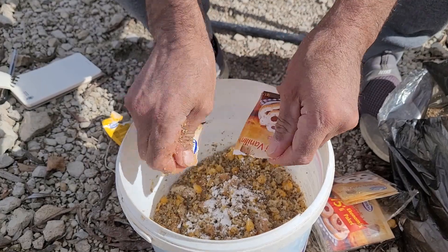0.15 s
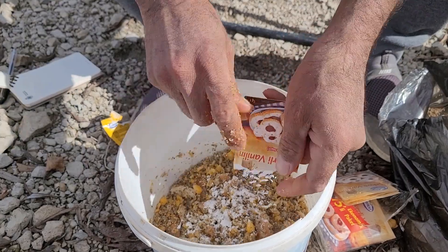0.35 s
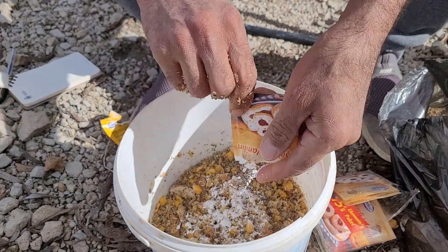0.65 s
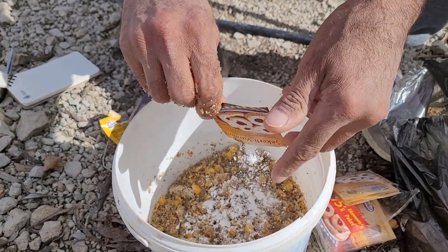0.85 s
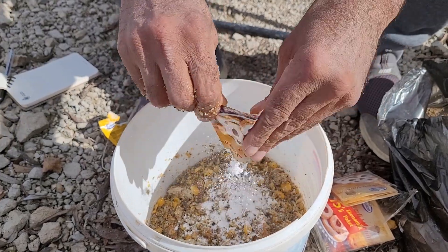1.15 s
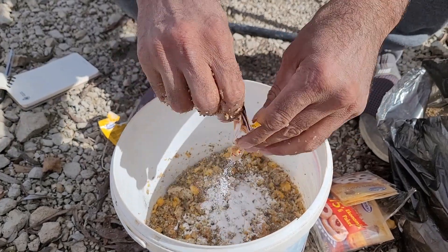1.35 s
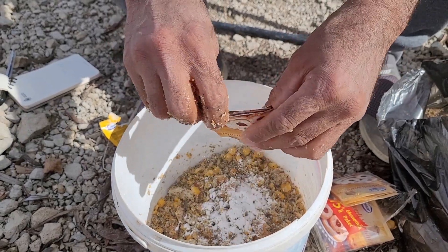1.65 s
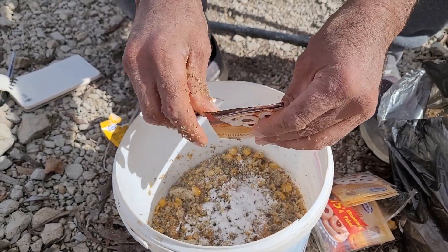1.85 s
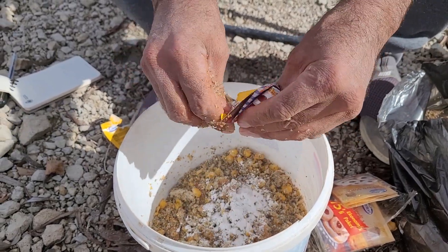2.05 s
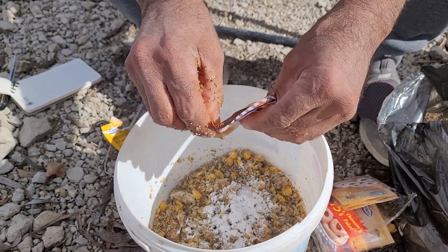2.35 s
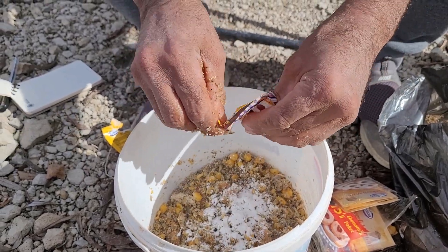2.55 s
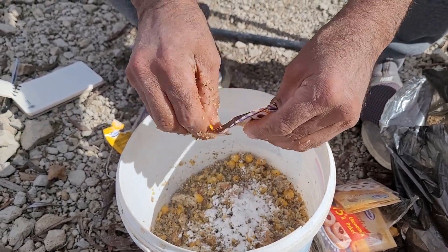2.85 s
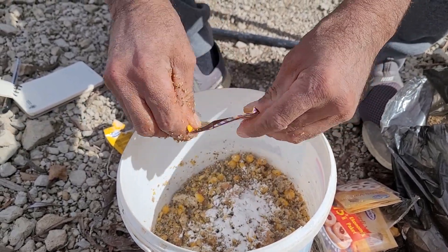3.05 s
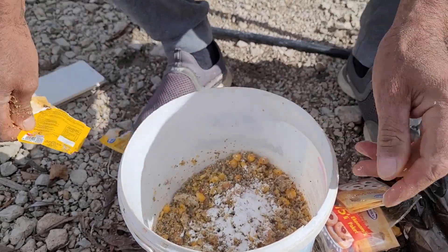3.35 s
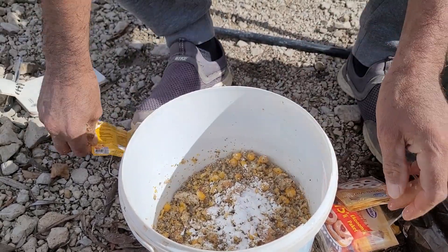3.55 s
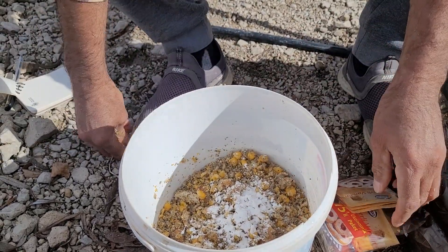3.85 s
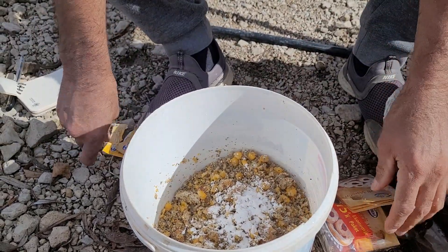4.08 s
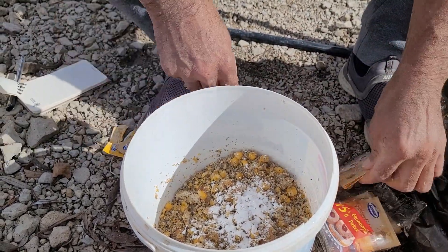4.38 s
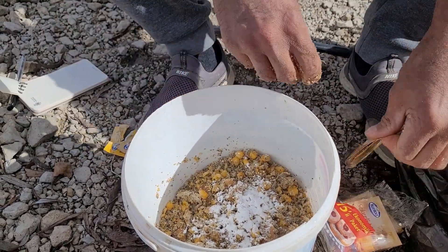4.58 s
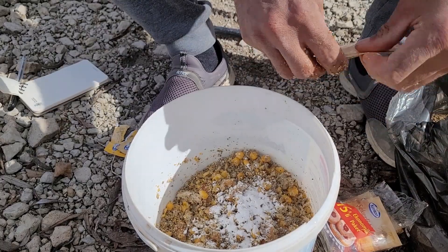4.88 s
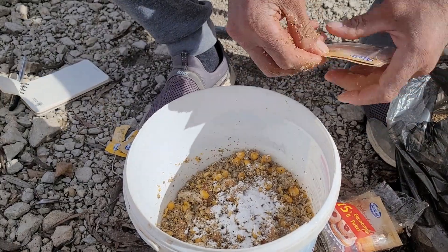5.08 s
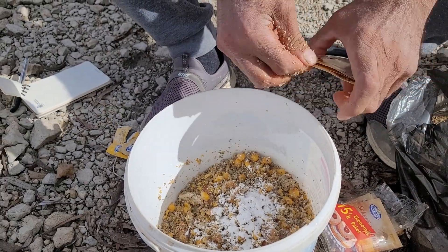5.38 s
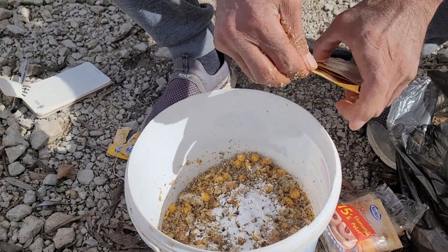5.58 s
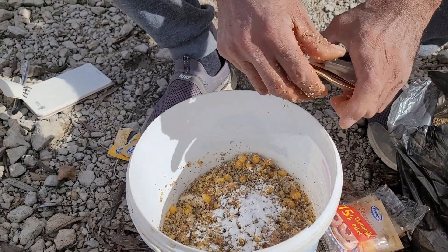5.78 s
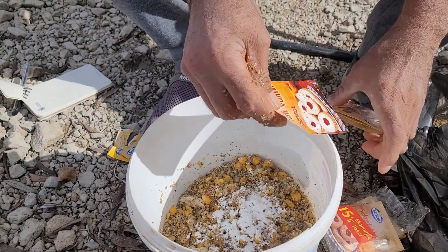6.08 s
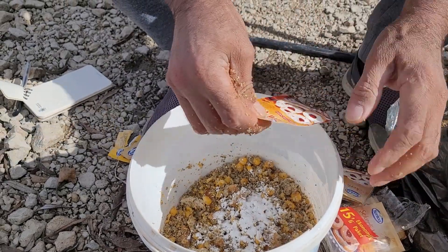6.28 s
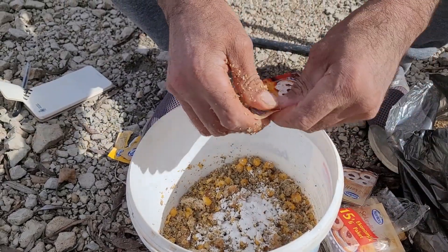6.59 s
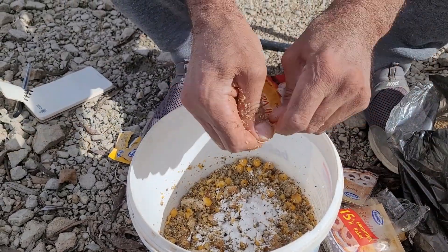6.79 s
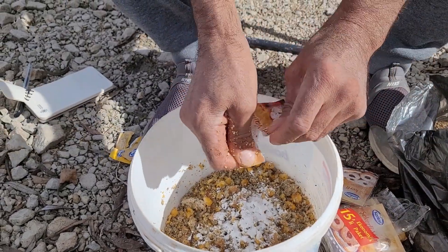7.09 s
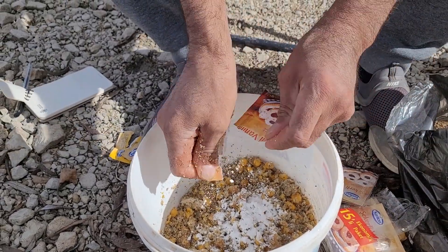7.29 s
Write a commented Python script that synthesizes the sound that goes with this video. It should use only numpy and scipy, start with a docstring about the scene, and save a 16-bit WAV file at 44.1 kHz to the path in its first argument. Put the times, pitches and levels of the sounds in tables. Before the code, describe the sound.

Close outdoor sound of little paper packets being opened over a bucket. A brief rip and low wind buffeting come first, followed by scattered crisp crackles and sliding powder that build into busier crinkling. The paper pauses briefly, then rustles and snaps again with a few soft finger taps, ending in several short tears. Light wind bumps the microphone, and a faint far hum and airy hiss lie behind.

```python
"""Small paper sachets crinkle, shake and tear in two hands over an open plastic bucket, close up, outdoors.
Each crease snaps and the bucket throws it back for a few ms; paper and powder rustle in between,
and fingers knock softly on the packets. A light wind buffets the two microphone ports separately
over a faint far hum and hiss."""
import sys
import numpy as np
from scipy.fft import rfft, irfft, next_fast_len
from scipy.io import wavfile
from scipy.ndimage import uniform_filter1d, map_coordinates

SR = 44100
rng = np.random.default_rng(int(sys.argv[2]) if len(sys.argv) > 2 else 0)


def unload_wav(signal):
    """Save mono or channel-first audio to the path in sys.argv[1] as 16-bit WAV at rate SR, clipped to [-1, 1]."""
    wavfile.write(
        sys.argv[1],
        SR,
        np.round(np.clip(np.atleast_2d(signal).T, -1, 1) * 32767).astype(np.int16),
    )


N = 327663


def amp(db):
    """Decibels to gain."""
    return 10 ** (np.asarray(db) / 20)


def unit(x):
    """Scaled to rms 1."""
    return x / np.sqrt(np.mean(x ** 2) + 1e-20)


def along(points, hz):
    """Read (frequency, value) points on a log axis."""
    freqs, values = np.transpose(points)
    return np.interp(np.log(hz + 1), np.log(freqs + 1), values)


def curves(rows):
    """One automation curve for each column after the time."""
    times, *columns = np.transpose(rows)
    return [np.interp(np.arange(N) / SR, times, column) for column in columns]


def wobble(rate):
    """A smooth random curve, rate knots a second."""
    return map_coordinates(rng.standard_normal(int(N * rate / SR) + 4), [np.arange(N) * rate / SR])


def filtered(x, response):
    """x through a frequency response."""
    size = next_fast_len(N + 8192)
    return irfft(rfft(x, size) * response(np.fft.rfftfreq(size, 1 / SR)), size)[..., :N]


def coloured(x, spectrum):
    """x through an EQ of (frequency [Hz], level [dB]) points, at rms 1."""
    return unit(filtered(x, lambda hz: amp(along(spectrum, hz))))


def steady_noise(spectrum, span_s):
    """Coloured stereo noise, its swells slower than span_s mostly levelled."""
    noise = coloured(rng.standard_normal((2, N)), spectrum)
    envelope = np.sqrt(np.abs(uniform_filter1d(noise ** 2, int(span_s * SR))))
    return unit(noise / (envelope + 0.21))


def gate(start, length, attack_s, release_s):
    """Rises, holds and lets go inside length seconds."""
    age = np.arange(N) / SR - start
    return np.clip(age / attack_s, 0, 1) * np.clip((length - age) / release_s, 0, 1)


def resonance(hz, centre_hz, width_hz):
    """A causal band-pass of peak gain 1."""
    return 1j * hz * width_hz / (centre_hz ** 2 - hz * hz + 1j * hz * width_hz)


# tone of the hiss: (frequency [Hz], level [dB])
HISS_EQ = [(530, -1), (900, 3.5), (1450, 0.5), (3190, -1), (3920, -0.5), (7300, -6.5), (8760, -14),
           (14100, -13), (15900, -12), (16500, -43)]


def hiss():
    """A smooth bed of outdoor air, independent at each port."""
    return amp(-63.5) * coloured(rng.standard_normal((2, N)), HISS_EQ) * amp([[-.6], [.6]])


# tone of the hum: (frequency [Hz], level [dB])
HUM_EQ = [(53, -69), (90, -13.5), (199, -10), (368, -7.5), (468, -12), (815, -14), (1000, -22), (1600, -40),
          (2080, -21), (3520, -120)]
# its stereo image: (frequency [Hz], left-right correlation [0-1])
HUM_IMAGE = [(100, 1), (300, 0.8), (700, 0.83), (1500, 0)]
# its fader ride: (time [s], relative level [dB], bass shelf [dB])
HUM_RIDE = [(.6, -64, -10.5), (.89, -69.5, -15), (1.9, -65.5, -19), (2.24, -70.5, 1), (2.5, -62.5, -28),
            (2.87, -68, -5), (3.57, -68, -7.5), (3.76, -66, 0.5), (4.36, -62.5, 3), (4.96, -66, -1),
            (5.4, -63, 0.5), (6, -67.5, -6.5), (6.35, -63, 8), (6.55, -66, 3.5), (6.89, -66, -7),
            (7.24, -64, -4), (7.43, -63, 2.5)]


def far_hum():
    """A distant, wavering hum, centred in the bass and wide higher up."""
    def mid_side(hz):
        spread = np.arccos(np.clip(along(HUM_IMAGE, hz), -1, 1)) / 2
        return amp(along(HUM_EQ, hz)) * [np.cos(spread), np.sin(spread)]

    mid, side = filtered(rng.standard_normal((2, N)), mid_side)
    hum = unit(np.array([mid + side, mid - side]))
    bass = filtered(hum, lambda hz: 1 / (1 + (hz / 210) ** 8))
    level_db, shelf_db = curves(HUM_RIDE)
    return amp(level_db + 3 + 2.6 * wobble(9)) * (hum - bass + amp(shelf_db) * bass)


def port_power(level_db, pan_db):
    """Wind power shared between the left and right port."""
    left_share = 1 / (1 + amp(-pan_db) ** 2)
    return 4 * amp(level_db) ** 2 * np.array([left_share, 1 - left_share])


# the breeze on the ports: (time [s], relative level [dB], left over right [dB])
BREEZE_RIDE = [(.4, -60, -29), (.75, -66, -31), (1.05, -62.5, -36), (1.4, -70.5, -28.5),
               (1.65, -58.5, -33.5), (1.85, -56, -28), (2.05, -66, -25), (2.3, -55, -36), (2.55, -61, -28),
               (2.78, -60, -25.5), (2.9, -71, -26), (3.3, -65, -35), (3.5, -79.5, -17.5), (3.85, -74, -6.5),
               (4.5, -76, -2), (5, -78, -16), (5.6, -70, -8), (6, -79, -22.5), (6.55, -64, -14),
               (6.68, -72.5, 0.5), (6.85, -49, 0), (7.2, -53.5, 0), (7.3, -56.5, -14), (7.43, -75, 11)]
# single eddies: (start [s], length [s], relative level [dB], left over right [dB], bite [dB])
EDDY_CUES = [(-.03, .47, -37, 24, -11.5), (-.02, 0.064, -52, 16.5, -6.5), (0.044, 0.046, -32.5, 17, -27.5),
             (0.109, 0.059, -23.5, 36, -2), (0.171, 0.088, -25.5, 25, -5), (.265, 0.051, -27.5, 29.5, -2.5),
             (0.298, .045, -21, 35, -1), (0.337, 0.056, -31, 21, 0.5), (0.394, 0.039, -24.5, 28.5, -8),
             (0.476, 0.039, -57.5, -31, -1), (0.574, 0.12, -61.5, -28, -3),
             (0.923, 0.097, -53.5, -33.5, -13), (1.1, 0.091, -56, -34, -11), (1.721, 0.082, -53, -1, -10),
             (1.793, 0.062, -56.5, -26.5, -10), (1.873, 0.029, -38, -6, -22),
             (1.944, 0.055, -55.5, -24, -8), (2.482, 0.057, -47, -35, -11), (2.645, 0.04, -44.5, -5, -18),
             (4.63, 0.0757, -66, -1, 3), (4.76, 0.056, -57.5, -5, -2), (5.184, 0.053, -66.5, 1, -1),
             (6.058, 0.086, -67, -6.5, -5), (6.74, 0.054, -46.5, 1, -20), (6.802, 0.051, -48, -1, -6),
             (6.916, 0.11, -49.5, -2, 3), (7.075, 0.064, -51.5, -12, -14), (7.223, 0.041, -38.5, 1, -5.5)]
# the wind's low rumble, and the bite and thump of strong gusts: (frequency [Hz], level [dB])
RUMBLE_EQ = [(12, -21), (20, -78), (43, 1.5), (59, 1), (116, -9.5), (172, -20), (300, -19.5), (390, -37),
             (660, -120)]
BITE_EQ = [(100, -10), (170, -6.5), (266, -2), (451, -19.5), (609, -29.5), (679, -31.5), (1500, -76),
           (1950, -80), (3300, -120)]
THUMP_EQ = [(50, -42), (90, -3), (140, 1), (190, -34), (300, -92)]


def wind():
    """Eddies buffet each port on its own; strong gusts reach higher in pitch."""
    level_db, pan_db = curves(BREEZE_RIDE)
    power = port_power(level_db + 0.5 * wobble(35), pan_db)
    bite_power = np.zeros((2, N))
    for start, length, db, side_db, bite_db in EDDY_CUES:
        eddy = port_power(db, side_db)[:, None] * gate(start, length, attack_s=.016, release_s=.0081) ** 4
        power += eddy
        bite_power += eddy * amp(bite_db) ** 2
    rumble = steady_noise(RUMBLE_EQ, span_s=.04)
    bite = steady_noise(BITE_EQ, span_s=.018)
    thump = steady_noise(THUMP_EQ, span_s=.0263)
    strength = power / (power + amp(-29.5) ** 2)  # 0 in calm air, toward 1 in a strong gust
    body = (1 - 0.45 * strength) * rumble + 0.52 * strength * thump
    return np.sqrt(power) * body + amp(-3) * strength * np.sqrt(bite_power) * bite


# fingers on the packets: (time [s], relative level [dB], pitch [Hz])
KNOCK_CUES = [(1.133, -48, 607), (1.714, -49.5, 613.7), (2.385, -43.5, 701), (2.43, -44, 577),
              (2.595, -45.5, 626), (2.729, -48.5, 603), (3.059, -45, 750), (4.66, -41, 271),
              (5.689, -42.5, 477), (6.307, -45, 644.7), (6.94, -40, 305.8)]


def finger_knocks(attack_s=.002, t60_s=.025):
    """A soft blow briefly rings the air in the packet: a hollow knock, dead centre."""
    out, t = np.zeros(N + SR), np.arange(SR // 20) / SR
    envelope = (1 - np.exp(-t / attack_s)) * amp(-60 * t / t60_s)
    for start, db, hz in KNOCK_CUES:
        out[round(start * SR):][:len(t)] += amp(db + 7.5) * envelope * np.sin(2 * np.pi * hz * t)
    return out[:N]


# where the hands are: (time [s], lead of the left port [ms])
HAND_PATH = [(0, 0.14), (3.2, 0.17), (3.75, 0.21), (3.95, .1), (4.1, 0.028), (4.7, -0.049), (5.2, 0.1),
             (5.8, 0.03), (6.2, -0.068), (6.7, 0.13), (7.43, 0.12)]


def left_lead_ms(times):
    """How much sooner sound from the hands reaches the left port."""
    return np.interp(times, *np.transpose(HAND_PATH))


# Weight is the paper's low band and sparkle its top band, both set against the middle band's level.
# paper held between strokes: (time [s], level [dB], weight [dB], sparkle [dB])
HOLD_RIDE = [(0, -62.5, 12, -5.5), (.4, -62, 5, -6), (1, -64.5, 2.5, -7), (1.9, -62, 5, -4),
             (2.3, -60, 3, -8), (3, -60.5, 3, -6), (3.2, -64, 6, -6), (3.75, -63.5, 5.5, -7),
             (4, -61, 1.5, -0.5), (4.5, -59, 2.5, 3), (4.65, -62.5, 5, -7.5), (5.3, -63, 5, -5),
             (5.65, -61, 3, -6), (5.85, -63.5, 4.5, -10.5), (6.15, -58.5, 2, 0.5), (6.42, -63.5, 4.5, -6.5),
             (6.93, -62, 5.5, -3.5), (7.43, -63, 4, -6.5)]
# paper and powder sliding: (peak time [s], level [dB], width [s], weight [dB], sparkle [dB])
SLIDE_CUES = [(.244, -56.5, 0.064, -1, -2), (.833, -59, 0.055, -1, -6), (1.003, -62.5, 0.1, 3.5, -3.5),
              (1.14, -52.5, 0.043, 4.5, -8.5), (1.227, -59.5, 0.067, 6, 0), (1.447, -62, 0.034, 0, 2),
              (1.63, -56, 0.018, -5, -1), (1.73, -54.5, 0.033, 0.5, -2), (2.309, -52.5, 0.046, 2.5, -1),
              (2.396, -53, 0.01, 10, -10), (2.468, -49.5, 0.033, -2, -6), (2.641, -48, .06, 0, -6),
              (2.805, -48, 0.04, -2.5, -1), (2.97, -51, 0.033, -2, -1), (3.062, -54, 0.021, 2, -10),
              (3.906, -56.5, 0.17, 5, -1), (3.956, -55, 0.018, 8.5, -3), (4.051, -61, 0.079, 4.5, -7),
              (4.147, -52.5, 0.045, 5.5, 1), (4.297, -54, 0.18, 0.5, -5), (4.529, -55.5, 0.026, -1, -6),
              (5.004, -64.5, 0.062, -7, 7), (5.217, -61, 0.078, -3.5, -4), (5.328, -51, 0.022, -26, -4),
              (5.44, -53, 0.074, -7, -5), (5.522, -53.5, 0.043, -2, -8), (5.748, -54.5, 0.031, -3, -5),
              (5.939, -59.5, 0.052, 2.5, 3.5), (6.111, -57.5, 0.034, -17, -4),
              (6.292, -43.5, 0.034, -4, -3), (6.336, -56, 0.058, 7, -6), (6.675, -61.5, 0.02, 8, -12)]
# paper tearing: (start [s], length [s], level [dB], weight [dB], sparkle [dB])
TEAR_CUES = [(-.02, 0.074, -41, -10, -1), (6.945, 0.089, -38.5, -6.5, 0), (7.101, 0.019, -43, 3, -10),
             (7.142, .09, -54, -3, 1), (7.195, 0.11, -45.5, -5, 3.5)]


def paper_strokes():
    """Power envelopes of the middle, weight and sparkle bands: holding, sliding and tearing add up."""
    level_db, weight_db, sparkle_db = curves(HOLD_RIDE)
    power = amp([level_db, level_db + weight_db, level_db + sparkle_db]) ** 2
    t = np.arange(N) / SR
    for peak, db, width, weight_db, sparkle_db in SLIDE_CUES:
        near = slice(max(round((peak - 3 * width) * SR), 0), round((peak + 3 * width) * SR))
        swell = amp(db - 17.5 * np.abs(t[near] - peak) / width)  # 17.5 dB down one width from the peak
        power[:, near] += (swell * amp([[0], [weight_db], [sparkle_db]])) ** 2
    for start, length, db, weight_db, sparkle_db in TEAR_CUES:
        rip = amp(db) * gate(start, length, attack_s=.0035, release_s=.044)
        power += (rip * amp([[0], [weight_db], [sparkle_db]])) ** 2
    return power


# tone of the rustle: (frequency [Hz], level [dB])
PAPER_EQ = [(290, -10), (600, 2.5), (1500, -5.5), (2700, 2), (4500, -1.5), (6800, -0.5), (9500, -3.5),
            (12000, 6.5), (15300, 0.5), (16500, -18)]


def rustle():
    """Tiny creases and fibres let go in clumps over a sliding hiss; the strokes ride it in three bands."""
    def moving(power, still_db):
        return np.sqrt(np.maximum(power - amp(still_db) ** 2, 0))

    clumps = amp(1.8 * wobble(90) + 2.2 * wobble(300))
    ticks = (rng.random(N) < .08) * amp(3 * rng.exponential(size=N).clip(0, 3)) * rng.standard_normal(N)
    grain = clumps * (0.77 * unit(ticks) + 0.5 * rng.standard_normal(N))
    samples = np.arange(N)
    shift = left_lead_ms(samples / SR) * SR / 1000 / 2  # half the lead goes to each port
    direct = np.array([map_coordinates(grain, [samples + s * shift], mode="nearest") for s in (1, -1)])
    diffuse = 2.07 * unit(clumps) * rng.standard_normal((2, N))
    paper = coloured(unit(direct) + diffuse, PAPER_EQ)
    low = filtered(paper, lambda hz: 1 / (1 + (hz / 3500) ** 6))
    high = filtered(paper, lambda hz: 1 / (1 + (8500 / (hz + 1)) ** 8))
    middle, weight, sparkle = paper_strokes()
    sound = (moving(middle, still_db=-64) * unit(paper - low - high)
             + moving(weight, still_db=-57.5) * unit(low)
             + moving(sparkle, still_db=-71) * unit(high))
    return amp(-3) * sound * amp([[-.8], [.8]])


def small_creases(count=160):
    """Random snap cues, laid out like SNAP_CUES, thickest and loudest where the paper moves most."""
    level, weight, _ = np.sqrt(paper_strokes())
    when, force = rng.random((count, 2)).T
    at = np.searchsorted(np.cumsum(level) / level.sum(), when).clip(SR // 100, N - 1)
    level_db = 20 * np.log10(level[at]) + 9 - 2 * np.log(force + 0.016)
    typical, spread = [5004, 2907, -17, -18.5, -17, -8.5], [1300, 140, 4, 2.87, 3.2, 1.7]
    timbre = typical + spread * rng.standard_normal((count, 6)).clip(-2, 2)
    timbre[:, 2:4] += 20 * np.log10(weight / level)[at, None]  # heavy strokes ring bucket and sheet more
    return np.column_stack([at / SR, level_db, timbre])


def snap_impulses(echo_db, common, own, ragged, release_at_s):
    """A faint noise lead-in, the crease's ragged click, then echoes partly unlike at each port."""
    age = np.arange(ragged.shape[-1]) / SR - release_at_s
    lead_in = amp(-32 + 60 * np.minimum(age, 0) / .02) * (age < 0)
    echoes = amp(echo_db - 60 * age / .016) * (1 - np.exp(-(age / .0017) ** 2)) * (age > 0)
    release = amp(-11 - 60 * np.abs(age) / .008) * (age > -.0003)
    impulses = (lead_in + echoes)[:, None] * (1.32 * common + 0.69 * own) + (release * ragged)[:, None]
    impulses[..., round(release_at_s * SR)] = 1  # the click itself
    return impulses / np.linalg.norm(impulses, axis=-1, keepdims=True)


# broad rings of a snap, the bucket's and then the bright edge: (pitch [Hz], width [Hz])
BROAD_RINGS = [(1250, 1500), (12000, 8000)]
# narrow notes inside the bucket's ring: (pitch [Hz], width [Hz], level against that ring [dB])
BUCKET_MODES = [(990, 57, -24), (1490, 50, -17.5), (2300, 600, -12.5)]
# the featured creases; the last four columns are trims against the crease's own level:
# (time [s], relative level [dB], crease pitch [Hz], sheet pitch [Hz],
#  bucket [dB], sheet [dB], edge [dB], echo [dB])
SNAP_CUES = [(0.0326, -32.5, 5660, 1904, -14.5, -13, -3.5, -13),
             (0.0573, -42, 3735, 2332, -24, -4, -17.5, -5), (0.2049, -40, 4270, 2540, -16.5, -9, -8, -19),
             (0.2492, -34.5, 7160, 2480, -33, -16, -8, -14.5),
             (0.2857, -29, 5250, 2400, -24.5, -12, -18, -16.5),
             (0.3125, -37, 4490, 2510, -12, -10, -15, -16),
             (0.4734, -38.5, 5400, 2900, -18, -15.5, -24, -3),
             (0.5077, -37, 4350, 2050, -19.5, -26, -18, -5.5),
             (0.6263, -46, 4210, 3450, -20, -8.5, -9, -21),
             (0.71, -45, 3690, 2569, -9.5, -13, -28.5, -15.5),
             (0.8076, -45.5, 4880, 2257, -10, -14.5, -17.5, -7),
             (0.9855, -54, 5650, 2280, 3.5, -19.5, -18.5, -13),
             (1.1349, -28, 4730, 2520, -17, -7, -22.5, -13),
             (1.148, -34.5, 5460, 3510, -14.5, -14.5, -20, -20),
             (1.1704, -36, 6960, 2486, -14, -6.5, -12, -4),
             (1.1932, -23.5, 5200, 2550, -41.5, -18.5, -32.5, -13),
             (1.218, -42, 4500, 2770, -1, -24, -13, -24), (1.2385, -38.5, 4440, 2332, -3.5, -25.5, -12, 0),
             (1.286, -38.5, 5170, 2840, -31.5, -27, -11.5, -15),
             (1.304, -43, 5380, 3440, -26, -24.5, -9.5, -8), (1.4426, -47, 5386, 3440, -5.5, -5, -7, -20),
             (1.4609, -23.5, 5065, 2560, -14, -18.5, -36, -4),
             (1.515, -29, 4480, 2350, -12.5, -12.5, -23, -15),
             (1.5625, -23.5, 4970, 3100, -14.5, -20, -19.5, -6),
             (1.6364, -41, 4370, 3505, -12.5, -15.5, -15.5, -11),
             (1.715, -32, 5020, 2485, -11, -15.5, -10, -3.5), (1.7205, -34, 4510, 3350, -5, -11, -13.5, -2),
             (1.7749, -43.5, 7300, 3070, -22.5, -21, -19, -15), (1.957, -35, 5480, 2820, -16, -16, -16, -8),
             (1.962, -38.5, 6340, 1900, -8, -21, -14.5, -4), (1.971, -38, 6490, 2460, -25, -15, -15, -11),
             (1.989, -22, 5060, 1920, -27, -18, -33.5, -29), (2.0128, -41, 5080, 2180, -14, -13, -11, -13),
             (2.0248, -24, 6815, 2560, -24.5, -20, -13, -14),
             (2.1122, -47, 6910, 2355, -19, -7.5, -18.5, -13),
             (2.1447, -36.5, 3760, 2515, -10, -14.5, -22, -20.5),
             (2.1647, -43, 5540, 3550, -23, -16, -16, -19),
             (2.2125, -32.5, 5050, 1920, -17, -16, -21.5, -13),
             (2.2263, -28, 5350, 2430, -16, -8, -13.5, -18),
             (2.2761, -25, 5670, 2490, -23, -20, -15.5, -9.5),
             (2.3073, -32.5, 4870, 3034, -19.5, -21, -10, -9),
             (2.3148, -29.5, 5260, 2740, -30, -12, -23.5, -19),
             (2.3493, -39, 6880, 3110, -29, -14, -10, -9), (2.386, -26, 6540, 3260, -21, -25, -10, -9),
             (2.3981, -27.5, 4390, 3330, -12, -25.5, -23.5, -13),
             (2.4374, -35, 5570, 3590, -19, -12, -18.5, -19),
             (2.4447, -25, 3980, 3400, -17, -15, -21.5, -8),
             (2.4526, -17.5, 5180, 2350, -18, -23.5, -26, -10),
             (2.4627, -22, 5590, 3100, -18.5, -22, -36, -13), (2.5605, -22, 5600, 2560, -17, -32, -12, -15),
             (2.5712, -30, 4960, 3070, -17.5, -13, -16.5, -16.5),
             (2.5958, -16.5, 5600, 3530, -23.5, -26, -24, -15),
             (2.619, -25, 3720, 3075, -11.5, -9, -18.5, -27),
             (2.625, -31.5, 6140, 1920, -16, -19.5, -17, -16.5),
             (2.652, -40, 6800, 2193, -21, -18, -9, -11), (2.7077, -31, 7030, 2960, -27, -17.5, -15, -24.5),
             (2.7287, -25, 5580, 3460, -19.5, -24, -16, -12),
             (2.7586, -30.5, 5420, 3080, -14, -20, -16, -11.5),
             (2.7859, -40, 6890, 2458, -13, -10, -6, -8.5),
             (2.7926, -31, 4400, 2810, -24, -11.5, -9.5, -18),
             (2.8225, -34.5, 6290, 2620, -29.5, -30.5, -14, -8.5),
             (2.8842, -29, 6400, 2850, -19, -21.5, -24, -18),
             (2.8966, -44, 5490, 2037, -5, -15, -17, -15.5),
             (2.9539, -29.5, 7080, 3330, -13.5, -16.5, -18, -9),
             (2.9621, -30.5, 6120, 3170, -22, -23.5, -16.5, -18.5),
             (2.981, -20, 6590, 3150, -35, -37, -31, -21), (3.0616, -33, 6040, 1920, -12, -34, -22, -9),
             (3.1108, -34.5, 6000, 3560, -14, -21, -11, -10),
             (3.1252, -42, 7220, 2740, -12.5, -15.5, -17.5, -16),
             (3.8921, -35, 4274, 3170, -41, -9, -11.5, -15.5),
             (3.916, -35, 3750, 2826, -19.5, -11, -23, -17),
             (3.9306, -44, 4780, 2880, -14, -12.5, -24, -10.5),
             (3.9434, -35, 3700, 2880, -17, -18, -15, -17.5), (3.972, -49, 3660, 2930, -13.5, -8, -10, -15),
             (4.0088, -37.5, 3640, 2660, -21, -9, -16, -8), (4.0264, -48, 3600, 3010, -16, -7.5, -18, -12),
             (4.057, -38.5, 3613, 3560, -29.5, -17, -23, -15.5),
             (4.1273, -35.5, 5340, 2455, -18, -33, -8, -22),
             (4.135, -32, 3830, 3400, -24.5, -20, -5.5, -21), (4.148, -42, 4716, 2997, -28, -28, -1, -18),
             (4.1815, -30.5, 7340, 3238, -23, -34.5, -23, -18),
             (4.2546, -38.5, 7520, 2520, -29, -20.5, -5, -24),
             (4.286, -43.5, 4800, 2830, -22, -16, -14.5, -10),
             (4.3119, -44, 5470, 2850, -22, -17.5, -7, -15),
             (4.3216, -38, 4805, 3198, -21, -23, -10, -16.5), (4.344, -42, 3720, 3290, -23, -6, -18.5, -15),
             (4.4872, -41, 7270, 2464, -21, -27, -9.5, -7),
             (4.533, -29.5, 6160, 2310, -24, -22, -17.5, -13.5),
             (4.5418, -37, 5400, 2077, -33.5, -24, -6, 0.5), (4.576, -37, 5960, 2712, -39, -22, -14.5, -22),
             (4.6595, -42.5, 3740, 1940, -16, -8.5, -22, -11),
             (4.669, -43, 4270, 2730, -12.5, -12, -10, -21),
             (4.6866, -41.5, 4190, 2730, -19, -11.5, -9, -14),
             (4.7865, -32, 4580, 2352, -20.5, -19, -11.5, -11),
             (4.7956, -39.5, 4133, 3196, -16, -15.5, -12, -14),
             (4.9504, -42, 4168, 2410, -13.5, -23, -5, -12), (4.994, -36, 6440, 2950, -16, -18.5, -6, -8),
             (5.0534, -39, 3850, 3240, -17.5, -13.5, -24, -8.5),
             (5.231, -45, 4450, 3090, -16.5, -15, -8.5, -19), (5.339, -39, 6900, 3350, -25, -23.5, -12, -7),
             (5.4124, -41.5, 4270, 2980, -16, -9, -12, -18.5),
             (5.438, -27.5, 3667, 3410, -28.5, -12.5, -14, -11),
             (5.505, -40, 3720, 3254, -21.5, -12, -9, -9.5), (5.5293, -36.5, 3877, 3260, -18, -13, -9, -7),
             (5.5464, -21.5, 4330, 3036, -29, -19, -16.5, -16),
             (5.6332, -33, 3810, 3490, -24.5, -32, -17.5, -21),
             (5.6921, -28, 3465, 3700, -16, -23, -13.5, -25),
             (5.7474, -35, 5000, 2720, -24.5, -18, -7.5, -6.5),
             (5.7553, -31, 4515, 3190, -33, -19, -25.5, -12.5), (5.901, -34, 4160, 2970, -15, -22, -12, 0),
             (5.9238, -37, 4040, 3296, -10, -32, -14, 0),
             (6.0117, -38.5, 3880, 2880, -11.5, -13.5, -5.5, -8.5),
             (6.086, -36.5, 4970, 3600, -38.5, -16, -12, -12),
             (6.095, -33.5, 3540, 3090, -30, -10, -9.5, -11),
             (6.1178, -34, 7580, 2310, -36, -26, -20, -12.5), (6.1793, -34, 6640, 3090, -30, -29, -30, -9),
             (6.1953, -33.5, 7390, 2890, -33, -13, -30, -19),
             (6.2317, -45, 4750, 3520, -39.5, -19.5, 4, -17.5),
             (6.2707, -28.5, 5400, 3140, -24, -20.5, 3.5, -7),
             (6.3076, -21, 3870, 3164, -18.5, -19, -17.5, -5),
             (6.3337, -37, 6170, 2887, -18.5, -18.5, -15, -19),
             (6.3409, -26, 4020, 3446, -17.5, -22, -19, -10), (6.3575, -41, 6500, 3090, -12, -15, -13, -9),
             (6.3649, -36, 3800, 3400, -21.5, -9, -18, -18), (6.4473, -33, 3600, 3445, -26, -41, -41, -4),
             (6.6773, -30.5, 5560, 2870, -22, -11.5, -14.5, -15),
             (6.859, -51, 7160, 2330, -5.5, -9, -20, -11), (6.8721, -32, 5280, 2110, -34, -26, -15, -22.5),
             (6.9194, -33.5, 4200, 2765, -13, -7.5, -8.5, -20),
             (6.9416, -22, 6960, 2300, -20.5, -17.5, -15, -14),
             (6.998, -20, 4540, 2794, -25, -8.5, -15, -15),
             (7.0574, -45.5, 4200, 2805, -10, -2.5, -12, -16),
             (7.0904, -29.5, 6290, 2870, -25.5, -10.5, -6.5, -9.5),
             (7.0984, -25.5, 3646, 3370, -21, -8.5, -22, -5), (7.2, -51, 7670, 2940, -22.5, -18, -8.5, -11),
             (7.2075, -32, 3530, 2687, -28, -15, -18, -12), (7.2493, -27.5, 6090, 2430, -19.5, -22, -9, 0),
             (7.2872, -35.5, 5900, 2220, -15, -28.5, -30, -23)]


def crease_snaps(size=2048, release_at_s=.003, cue_delay_s=.001):
    """Each crease is one sharp release ringing a cycle or two; the bucket walls scatter it back."""
    cues = np.vstack([SNAP_CUES, small_creases()]).T[..., None]
    times, level_db, crease_hz, sheet_hz, bucket_db, sheet_db, edge_db, echo_db = cues
    hz = np.fft.rfftfreq(size, 1 / SR)
    noise = rng.standard_normal((len(times), 4, size))
    common, own, ragged = noise[:, :1], noise[:, 1:3], noise[:, 3]
    impulses = snap_impulses(echo_db, common, own, ragged, release_at_s)
    # the broad low and bright rings vary randomly in pitch from snap to snap
    bucket, edge = (resonance(hz, pitch * (1 + 0.24 * ragged[:, [k]]), width) ** 2 / np.sqrt(width)
                    for k, (pitch, width) in enumerate(BROAD_RINGS))
    for pitch, width, db in BUCKET_MODES:
        bucket += amp(db) * resonance(hz, pitch, width) / np.sqrt(width)
    crease = resonance(hz, crease_hz, 0.64 * crease_hz) ** 2 / np.sqrt(0.79 * crease_hz)
    sheet = resonance(hz, sheet_hz, 0.5 * sheet_hz) ** 2 / np.sqrt(0.19 * sheet_hz)
    tone = crease + amp(bucket_db + 9.5) * bucket - amp(sheet_db + 9) * sheet - amp(edge_db + 11.5) * edge
    lead_ms = np.clip(left_lead_ms(times) + 0.035 * ragged[:, [3]], -.25, .25)
    at = np.round((times + cue_delay_s - release_at_s) * SR).astype(int) + np.arange(size)
    out = np.zeros((2, N + size))
    for port, sign in enumerate((1, -1)):
        arrival = np.exp(1j * np.pi * hz * sign * lead_ms / 1000)
        snaps = amp(level_db + 56 - sign * 0.66) * irfft(tone * rfft(impulses[:, port]) * arrival)
        out[port] = np.bincount(at.ravel(), snaps.ravel(), N + size)
    return out[:, :N]


def scene():
    """Paper up front, wind and distant air behind, at the two ports."""
    return crease_snaps() + finger_knocks() + rustle() + wind() + far_hum() + hiss()


def record(dry):
    """The microphones thin the lowest bass; a steep high cut closes off the top."""
    low_cut_hz, silent_above_hz = 30, 16200
    thinned = filtered(dry, lambda hz: 1 / (1 + (low_cut_hz / (hz + 1)) ** 4))
    return filtered(thinned, lambda hz: np.clip((silent_above_hz - hz) / 600, 0, 1) ** 2)


dry = scene()
out = record(dry)
unload_wav(out)
```